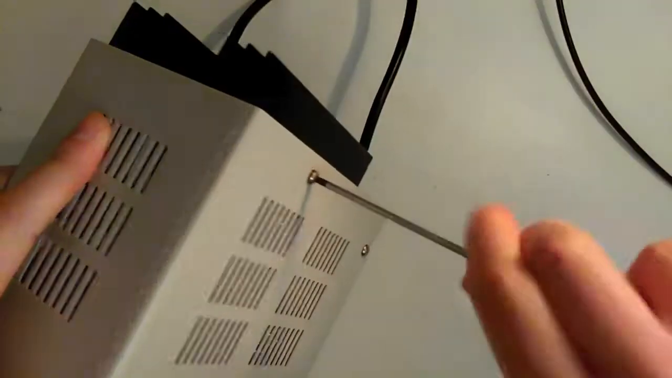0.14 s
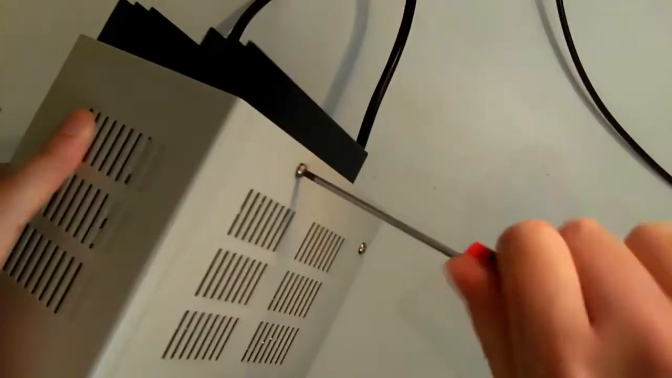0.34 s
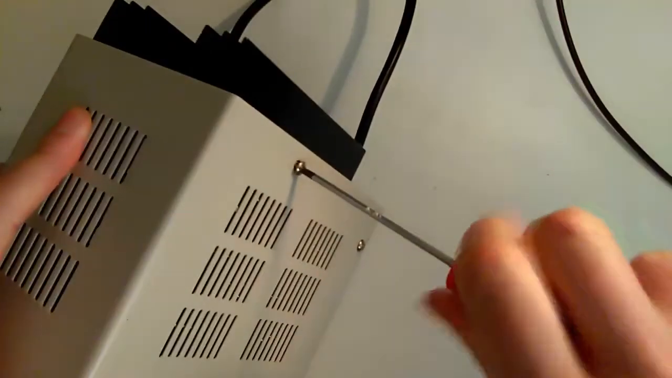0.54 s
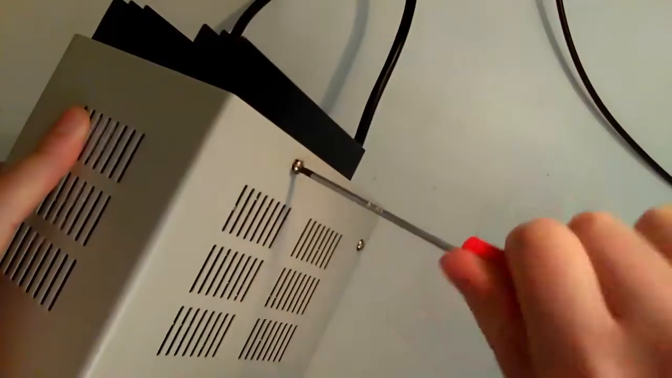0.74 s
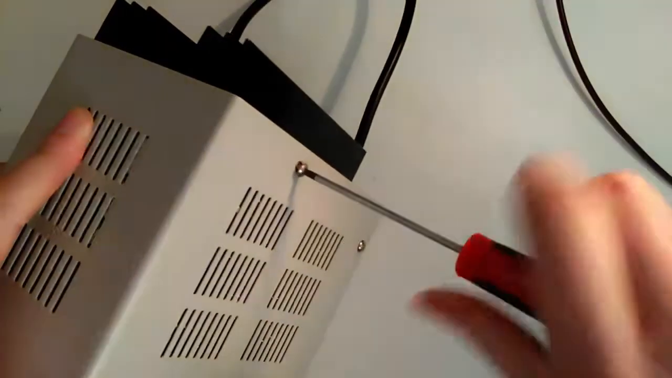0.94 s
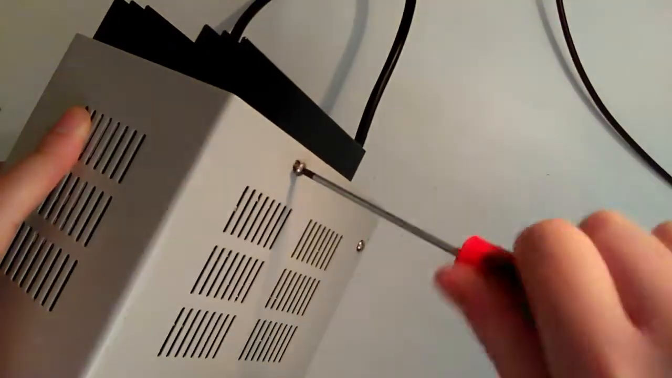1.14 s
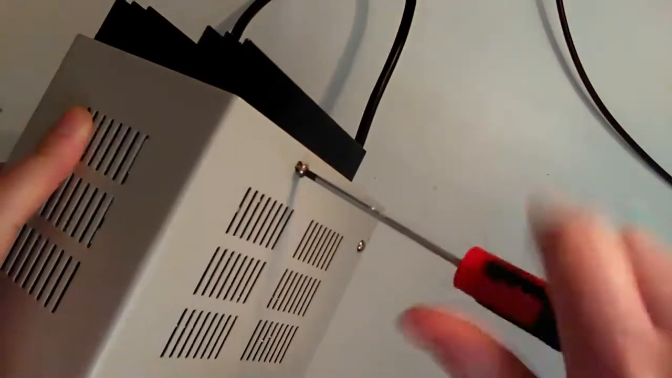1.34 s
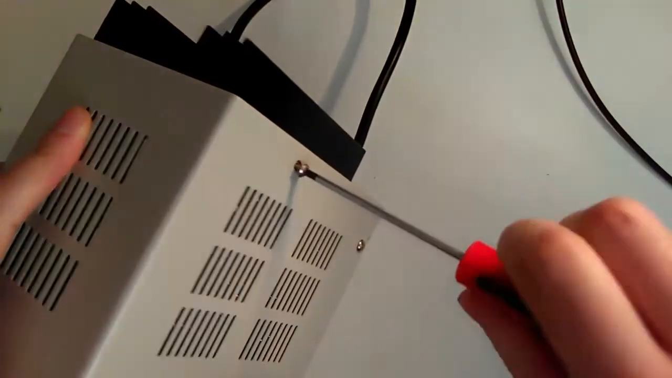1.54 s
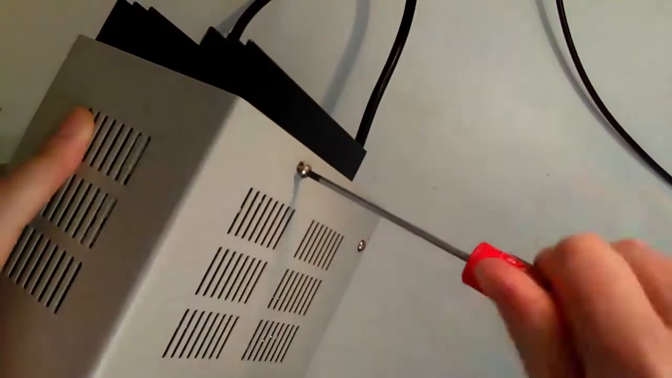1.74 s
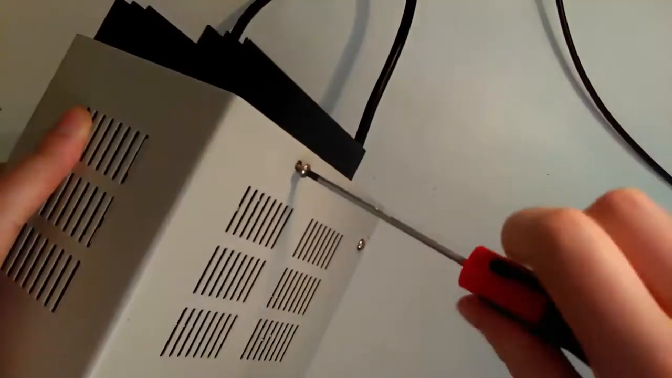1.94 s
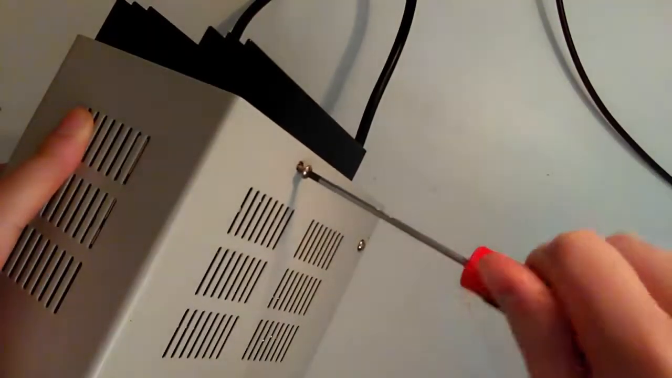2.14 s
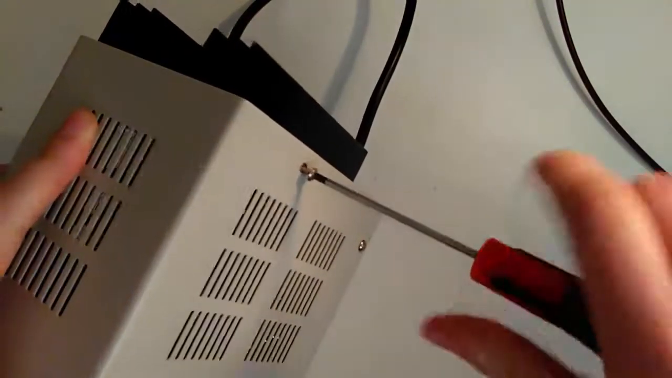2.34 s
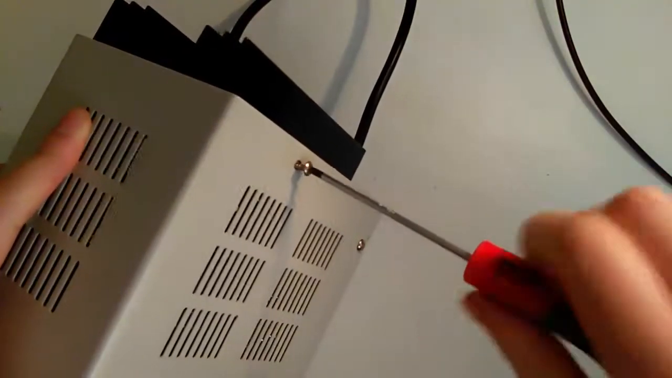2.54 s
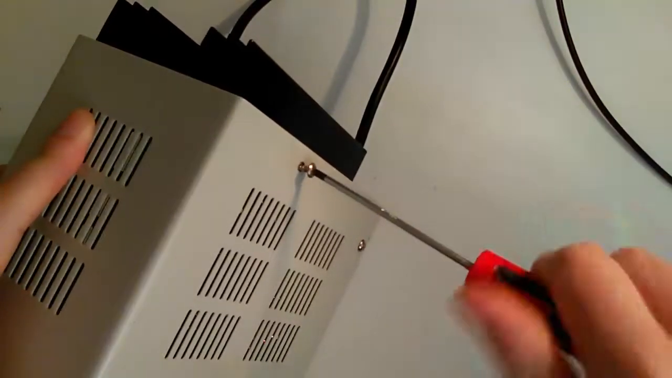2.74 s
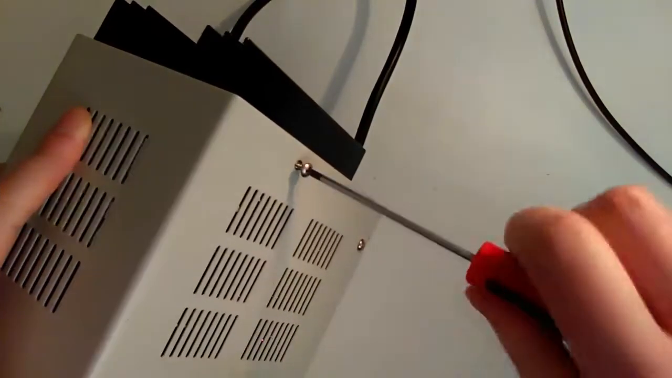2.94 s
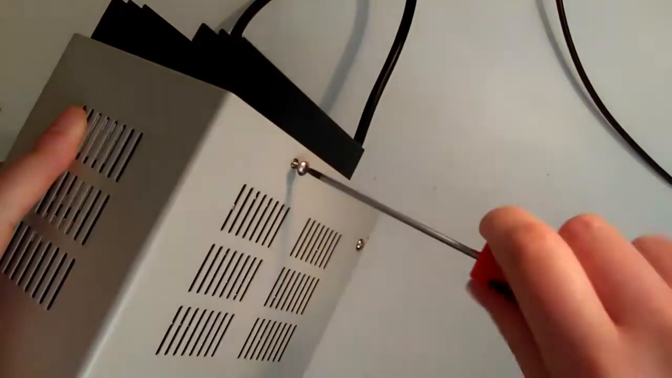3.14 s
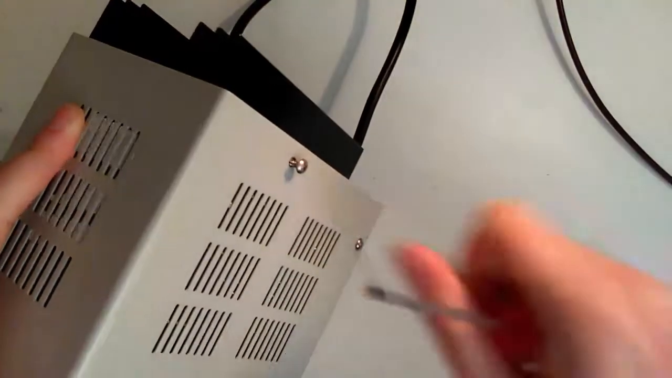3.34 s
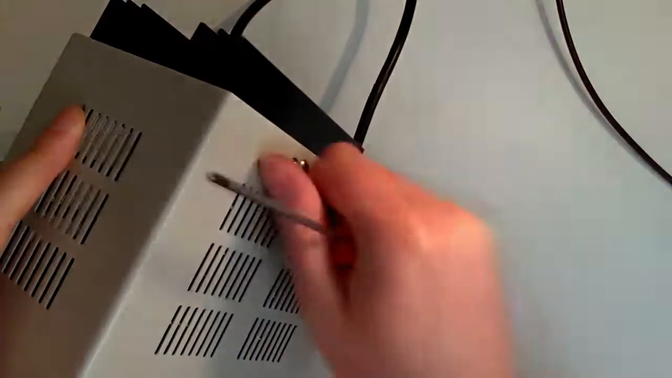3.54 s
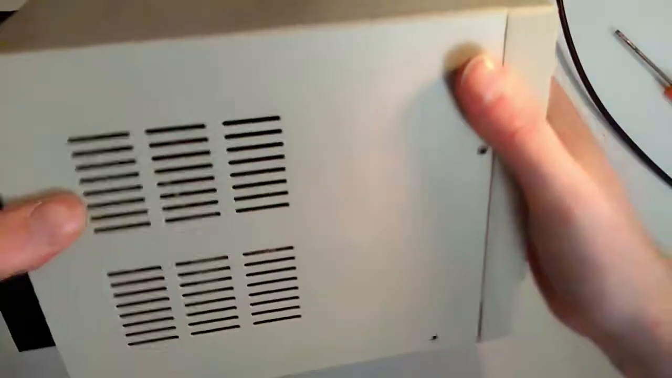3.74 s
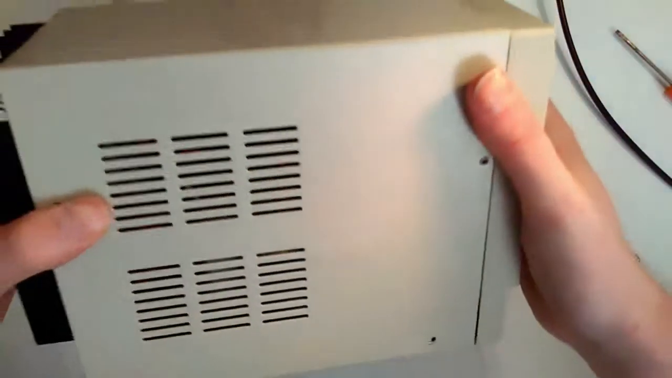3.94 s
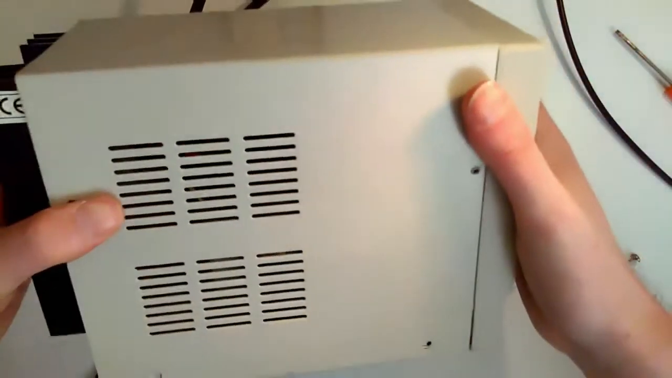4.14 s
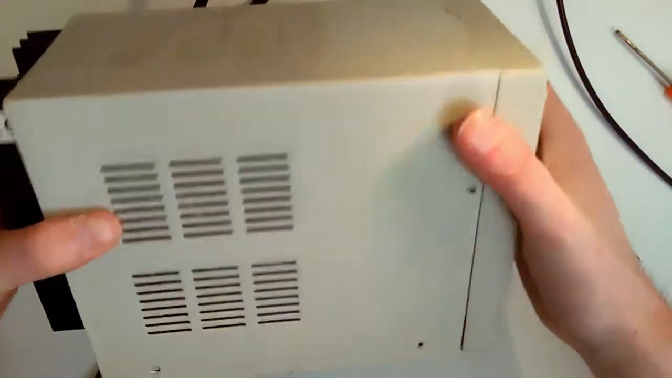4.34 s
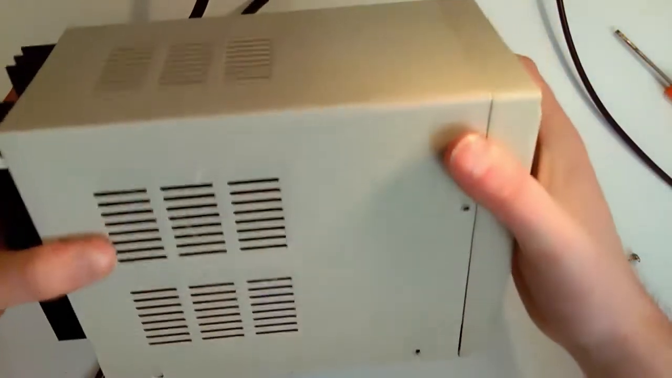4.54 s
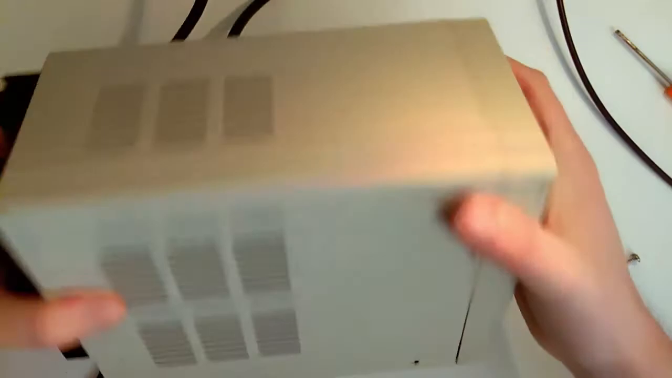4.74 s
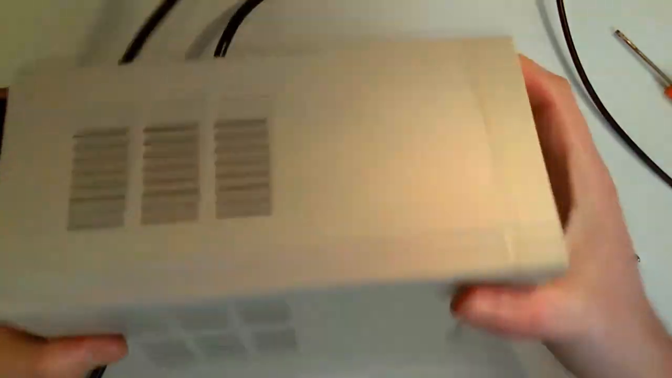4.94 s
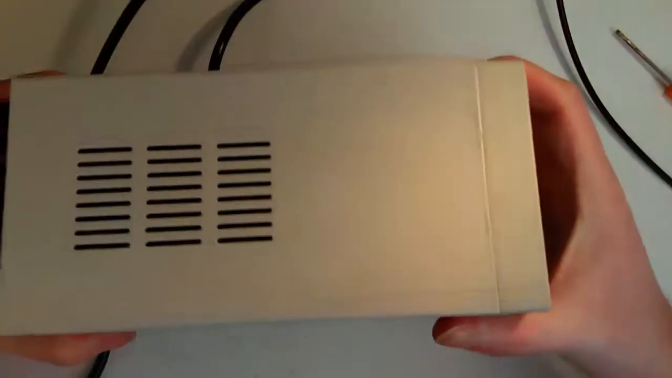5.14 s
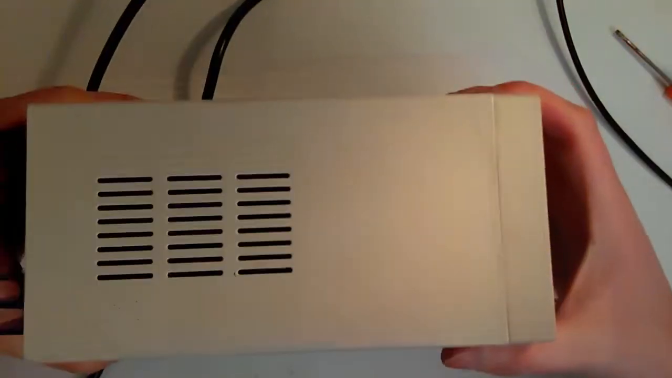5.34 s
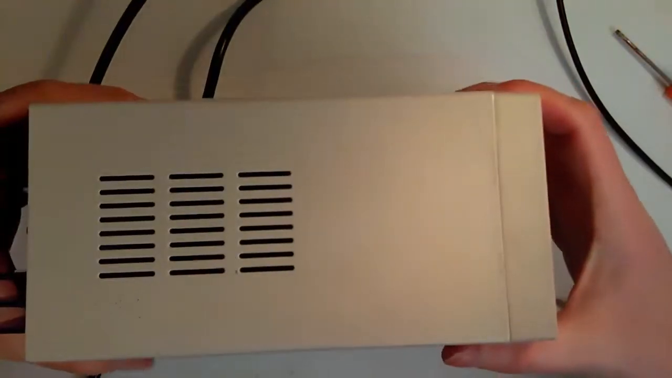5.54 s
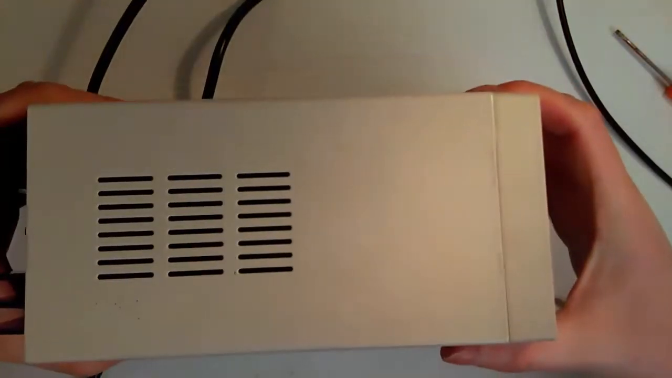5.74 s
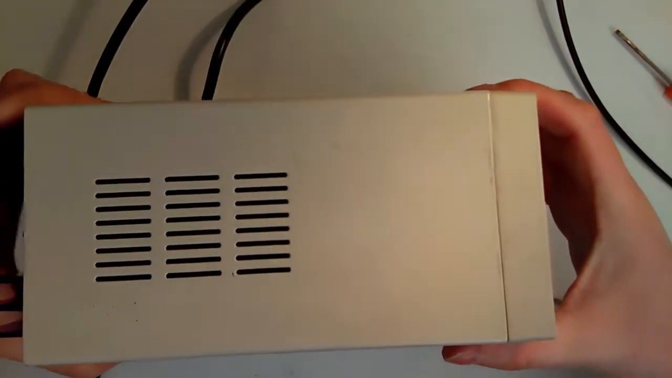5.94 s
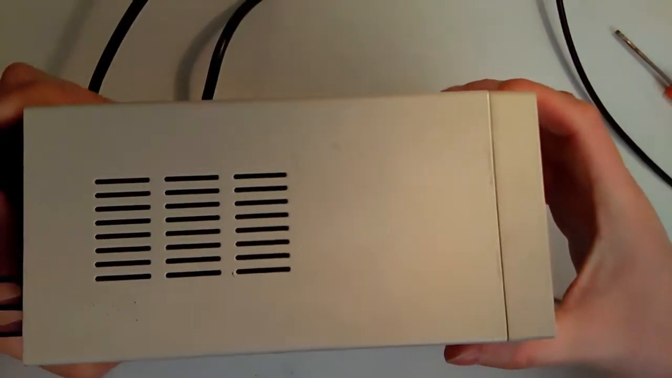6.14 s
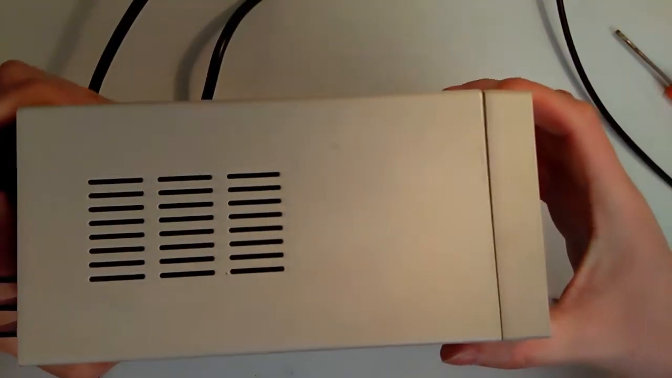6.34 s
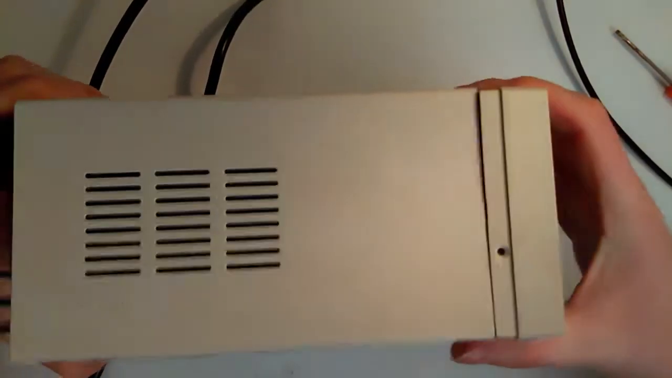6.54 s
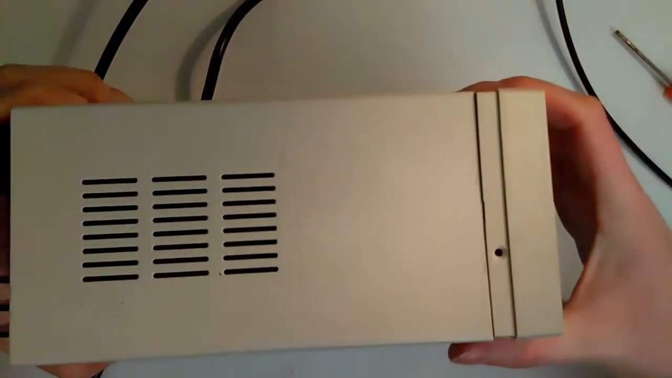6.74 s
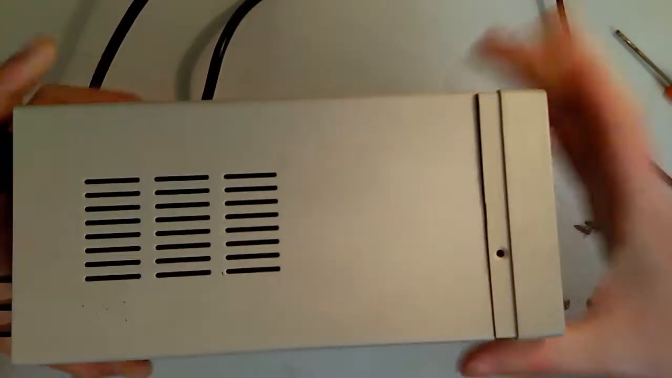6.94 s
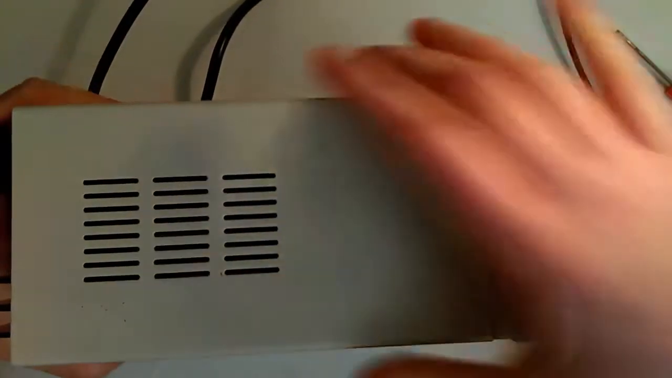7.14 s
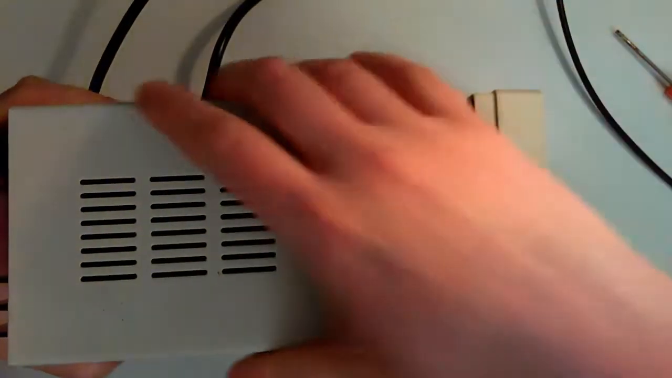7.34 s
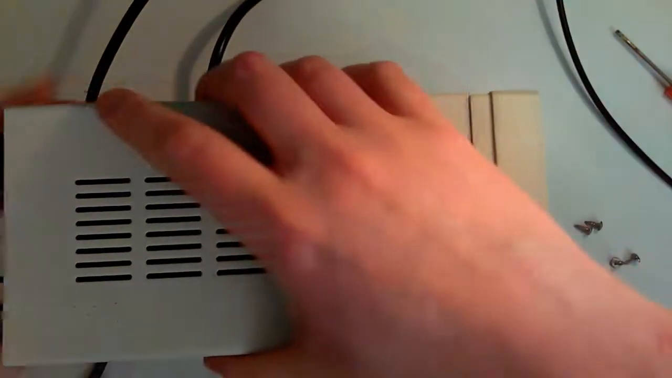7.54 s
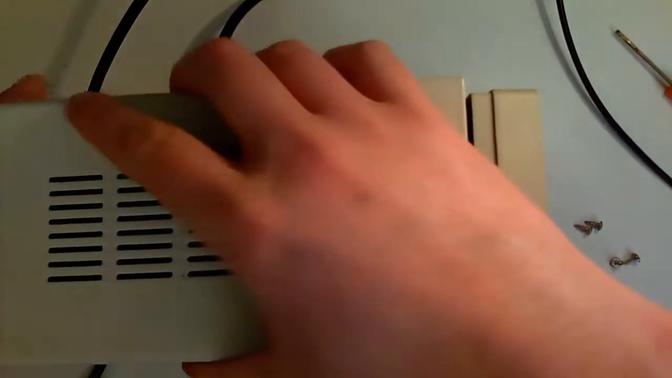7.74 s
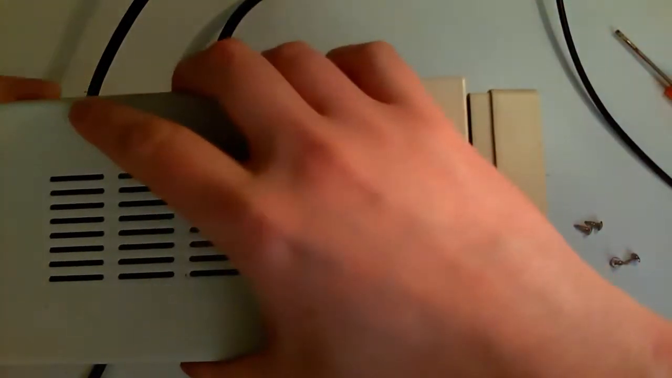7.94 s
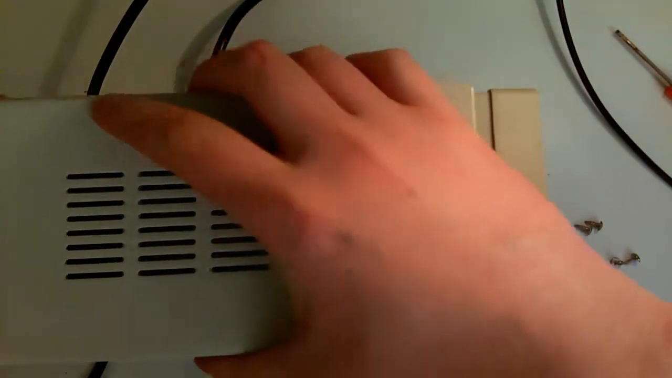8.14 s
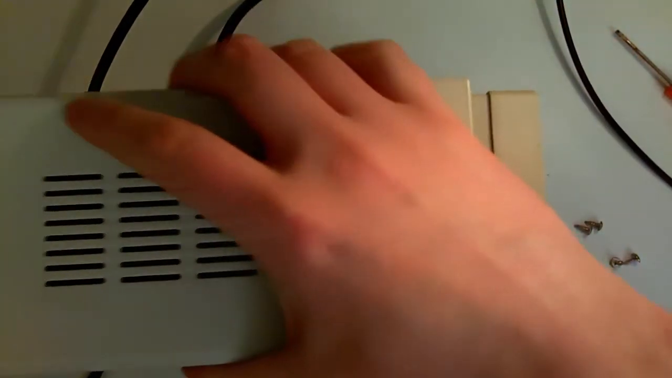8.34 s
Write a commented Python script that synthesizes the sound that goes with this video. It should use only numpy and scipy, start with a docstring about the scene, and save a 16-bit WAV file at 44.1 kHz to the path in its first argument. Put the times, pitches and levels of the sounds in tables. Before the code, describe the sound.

A hand screwdriver backs a screw out of a sheet-metal case with soft scrapes and clicks. Fingers swish faintly round the handle and a thin squeal passes. Then, louder, the case is turned and set down with dull desk thumps, and its cover slides off with scrapes and ringing metal knocks. One microphone picks it up in a small room with a faint low hum.

```python
"""First comes a small room's low hum, with soft scrapes and clicks as a hand screwdriver backs a screw
out of a sheet-metal case on a desk. Fingers swish round the handle and a thin squeal passes.
Then, louder, the case is turned, set down and its cover slid off. Knocks and scrapes make the metal
panels ring; thumps make the desk top ring. A noise suppressor turns the background down between sounds."""
import sys
import numpy as np
from scipy import signal
from scipy.fft import rfft, irfft
from scipy.io import wavfile
from scipy.ndimage import uniform_filter1d, minimum_filter1d

SR = 44100
rng = np.random.default_rng(int(sys.argv[2]) if len(sys.argv) > 2 else 0)


def file_out(sig):
    """Save sig as 16-bit WAV at sys.argv[1]."""
    # one column per channel
    cols = np.atleast_2d(sig).T
    # limit, then scale
    lim = np.clip(cols, -1, 1)
    pcm = np.round(lim * 32767).astype(np.int16)
    wavfile.write(sys.argv[1], SR, pcm)


N = 370440


def undb(db):
    """Turn decibels into a number to multiply by."""
    return 10 ** (np.asarray(db) / 20)


def unit(x):
    """Scale a sound to an average power of 1."""
    return x / np.sqrt(np.mean(x ** 2))


def colour(x, table):
    """Turn each pitch up or down along a curve of (pitch [Hz], level [dB])."""
    hz, db = np.transpose(table)
    f = np.fft.rfftfreq(x.shape[-1], 1 / SR) + 1e-9
    return irfft(rfft(x) * undb(np.interp(np.log(f), np.log(hz), db)), x.shape[-1])


def fade(ring_s, seconds):
    """A fade that drops 60 dB in ring_s seconds."""
    return np.exp(-np.log(1000) * np.arange(int(seconds * SR)) / SR / ring_s)


def rings(hz, ring_s, seconds):
    """Pure tones dying away, one in each row."""
    t = np.arange(int(seconds * SR)) / SR
    return np.sin(2 * np.pi * np.outer(hz, t)) * np.array([fade(d, seconds) for d in ring_s])


def near(hz, main_hz, octaves, far_db):
    """Tones near the main pitch take more of a blow than those far from it."""
    return undb(far_db * (1 - np.exp(-.5 * (np.log2(hz / main_hz) / octaves) ** 2)))


def add(out, s, sound, db):
    """Place a sound at time s with its peak at db."""
    i = int(s * SR)
    out[i:i + len(sound)] += (sound * undb(db) / np.abs(sound).max())[:N - i]


def wander(per_s, spread_db):
    """A volume that drifts to a new random level per_s times a second."""
    levels = undb(spread_db * rng.standard_normal(int(per_s * N / SR) + 2))
    return np.interp(np.arange(N) * per_s / SR, np.arange(len(levels)), levels)


# The tone of room air and microphone hiss: (pitch [Hz], level [dB])
AIR_TONE = [(20, 12), (50, 16.5), (110, -27), (160, 10.5), (256, -2), (416, 0.5), (714, -2), (1440, -15),
            (2220, -14), (4250, -22.5), (11600, -17.5), (16000, -20.5)]
# How loud the two hums are: (time [s], 100 Hz level [dB], 120 Hz level [dB])
HUM_LEVELS = [(0, -50.5, -53.5), (3.55, -46, -52), (3.65, -50, -57), (5.2, -50.5, -59), (8.4, -42, -50.5)]


def background(air_db=-55.5, in_step_s=.0103):
    """Room air and microphone hiss under two hums that beat against each other 20 times a second."""
    t = np.arange(N) / SR
    s, low_db, high_db = np.transpose(HUM_LEVELS)
    hum = 0
    for hz, db in ((100, low_db), (120, high_db)):
        tone = np.sqrt(2) * np.cos(2 * np.pi * hz * (t - in_step_s))
        hum += tone * undb(np.interp(t, s, db)) * wander(22, 0.7)
    return hum + undb(air_db) * unit(colour(rng.standard_normal(N), AIR_TONE))


# The panels' strong tones; wider ones die sooner: (pitch [Hz], width [Hz], level [dB])
PANEL_TONES = [(444.6, 48, 2.5), (509, 83, -19.5), (579.4, 13.4, -3), (643.3, 13, -5), (771, 97, -2),
               (858, 34, -15), (994.3, 29, 3.5), (1115, 76, -10), (1253, 50, -3), (1293, 68, 5),
               (1460, 49, -7), (1764, 39, -5), (2048, 160, -1), (2307, 220, 2.5), (2548, 260, -1.5),
               (2936, 320, -9.5), (3070, 120, -29)]
# The case's many weak tones in between: (pitch [Hz], level [dB])
WEAK_TONES = [(150, -15.5), (250, -5.5), (537, -5), (594, -3), (1170, -6.5), (1320, -12), (1480, -15.5),
              (2920, -10), (5000, -27), (6500, -90), (11000, -120)]
# The bright noise of a scrape's hiss or a knock's crack: (pitch [Hz], level [dB])
BRIGHT_TONE = [(1470, -14), (2500, -0.5), (3570, -4), (5150, -7), (6500, -6), (9150, -5), (15200, -17.5),
               (16000, -13.5)]
# The desk top's tones: (pitch [Hz], level [dB])
DESK_TONES = [(104, -2), (111, -11), (118, 9), (128, -5.5), (143, 5), (160, -9), (215, -5), (250, -6.5),
              (277, -12.5), (345, -6.5), (398, -18.5)]
# Scrapes of hand, thread or cover. The last three levels are added to the large panels' level:
# (peak time [s], large panels [dB], time to swell 20 dB [s], time to fade 20 dB [s], main pitch [Hz],
# small panels [dB], hiss of skin and rough edges [dB], desk rumble [dB])
SCRAPES = [(.1, -52, .15, 0.34, 544, -16, -18, 9.5), (.39, -49, 0.1, -0.03, 647, -18, -13, -4),
           (.48, -44, 0.09, 0.08, 630, -11, -17, 11.5), (.53, -50, 0.03, 0.22, 614, -18, -11, 12),
           (.84, -47.5, .06, 0.33, 520, -14, -13, 1), (.97, -58, 0.25, -0.44, 609, -9, -2, 14),
           (1.22, -57, 0.1, -0.34, 567, -6, 0.5, 12), (1.54, -56.5, 0.2, 0.4, 670, -6.5, -15.5, 6),
           (1.891, -53.5, 0.3, -0.03, 665, -7, -10, 11.5), (2.25, -53, 0.26, -0.3, 888, -6.5, -8, -4),
           (2.331, -43.5, 0.1, 0.12, 600, -14, -31, 5), (2.451, -37, 0.05, 0.19, 1080, -15, -14, -1),
           (2.54, -46.5, 0.18, 0.3, 689, -28.5, -6.5, 8.5), (2.868, -37, 0, .25, 1060, -17, -30, -5),
           (3.15, -56, 0.53, 0.25, 1050, -12, -1.5, 14), (3.575, -40, 0.01, 0.09, 500, -10.5, -32.5, 7),
           (3.701, -46, 0.2, 0, 674, -6, -14, 10), (3.926, -61.5, 1.01, 1, 690, -20, -22, 0),
           (4.169, -36.5, -0.03, 0, 530, -14, -30, 28), (4.29, -36, 0.07, 0.3, 640, -11, -16, 15.5),
           (4.35, -37.5, 0.0736, 0.17, 640, -14, -15.5, 11.5),
           (4.537, -36.5, -0.01, 0.1, 860, -6.5, -15, -10), (4.555, -55, -0.01, 0.26, 800, -12, 2, 7),
           (4.773, -37.5, 0.02, 0.0845, 600, -5.5, -11, 15), (4.82, -38, 0.07, 0.0868, 690, -12, -18.5, 14),
           (4.95, -46, 0.5, 0.05, 580, -13, -14.5, 7), (5.045, -42.5, -0.14, 0.12, 486, -15, -27, 1),
           (5.36, -43, .035, 0.21, 544, -13, -18, 20.5), (5.52, -52, -0.07, 0.43, 730, -9.5, -9, 11),
           (5.7, -53.5, 0.11, 0.52, 600, -17, -7.5, 16.5), (5.93, -59, 0, -1.3, 634, -9, -6, 7),
           (6.15, -54, 0.1, 2.8, 657, -9, -22, 10.5), (6.271, -50.5, -0.03, -0.2, 640, -8, -15.5, 22),
           (6.314, -35.5, 0, 0.3, 642, -22, -18.5, 9.5), (6.422, -31.5, 0.04, 0.02, 630, -9, -14, 13),
           (6.436, -14, 0.0063, .09, 624, -13, -18, -7.5), (6.51, -32, 0.09, 0.06, 760, -16, -21, 1),
           (6.554, -13.5, 0, 0.0333, 1120, -6.5, -15, -3.5),
           (6.659, -28, 0.12, 0.0558, 1110, -33.5, -25.5, 8.5), (6.753, -47, 0.53, 1.2, 650, -26, -12, 8),
           (7.215, -50, 0.33, 0.1, 820, -11, -13, 14), (7.307, -44.5, -0.1, 0.06, 660, -27, -22, 12.5),
           (7.427, -44, 0.1, 0.2, 783, -4, -7.5, 8.5), (7.652, -33, 0.09, 0.2, 1220, -4.5, -8.5, -14),
           (7.677, -21.5, 0.02, 0.1, 955, -11.5, -16, 2), (7.96, -54.5, 0.2, 0.3, 700, -2.5, -11, 15),
           (8.141, -42, 0.17, -0.2, 692, -4.5, -3.5, -3), (8.17, -26, 0.0171, 0.1, 680, -6, -13.5, -7),
           (8.335, -35.5, 0.066, 0.7, 810, -2.5, -5.5, 2), (8.39, -34, 0.06, -5, 834, -4, -12, 3)]


def scrapes(slips_per_s=3000, split_hz=1550):
    """Tiny uneven slips hiss, rumble the desk and shake the panels, most of all the one being held."""
    _, large_db, _, _, held_hz, small_db, hiss_db, desk_db = np.transpose(SCRAPES)
    slips = (rng.random(N) < slips_per_s / SR) * rng.standard_normal(N)
    slips *= undb(2 * np.minimum(rng.exponential(size=N), 3))  # a few slips are stronger
    slips = unit(slips) * wander(50, 2.2)
    large = slips * pressure(large_db, rest_db=-69.5)
    small = slips * pressure(large_db + small_db, rest_db=-76)
    metal = 0
    for push, side, db in ((large, "low", 16.5), (small, "high", 23)):  # large panels sound lower
        band = signal.butter(4, split_hz, side, fs=SR, output="sos")
        metal += undb(db) * signal.sosfilt(band, colour(push, WEAK_TONES))
    for hz, width, db in PANEL_TONES:
        if hz < split_hz:
            held_db = 20 * np.log10(near(hz, held_hz, octaves=0.11, far_db=-13.5))
            push = undb(18.5) * slips * pressure(large_db + held_db, rest_db=-77.5)
        else:
            push = undb(15) * small
        push *= wander(8, 2.1)  # the moving touch finds and loses each panel
        metal += undb(db) * signal.lfilter(*signal.iirpeak(hz, hz / (0.4 * width), SR), push)
    hiss = unit(colour(0.35 * slips + rng.standard_normal(N) * wander(40, 3.26), BRIGHT_TONE))
    hiss *= pressure(large_db + hiss_db, rest_db=-67.5, lingers=0.76)
    hz, db = np.transpose(DESK_TONES)
    desk_ring = undb(db + 3.1 * np.log2(hz / 118)) @ rings(hz, np.full(len(hz), 0.1), 0.21)
    rumble = unit(signal.fftconvolve(rng.standard_normal(N), desk_ring)[:N])
    rumble *= pressure(large_db + desk_db, rest_db=-48.5, lingers=1.19)
    return undb(-3) * metal + hiss + undb(-4) * rumble


def pressure(db, rest_db, lingers=1, settle_db=-25, settle_s=0.32):
    """How hard the rubbing is: each scrape swells, fades and settles to the level of resting hands."""
    s, _, swell_s, fade_s = np.transpose(SCRAPES)[:4, :, None]
    t = np.arange(0, N / SR, .001)
    after = np.maximum(t - s, 0)
    # swell or fade times of zero or less give a sudden edge
    swelling = undb(20 * np.minimum(t - s, 0) / np.maximum(swell_s, .002))
    fading = undb(-20 * after / np.maximum(fade_s * lingers, .01))
    settling = undb(settle_db - 20 * after / settle_s)
    shape = np.where(t < s, swelling, np.maximum(fading, settling))
    power = undb(db) ** 2 @ shape ** 2 + undb(rest_db) ** 2
    return np.interp(np.arange(N) / SR, t, np.sqrt(power))


# Metal hitting metal: (time [s], level [dB], extra crack level [dB], main pitch [Hz],
# rattle time [s], strength of tones far from that pitch [dB])
KNOCKS = [(0.371, -42, -28, 590, 0.011, -5.5), (0.476, -35, -15, 634, .017, -6.5),
          (0.817, -39.5, -19, 503, .014, -2.5), (0.839, -36, -30, 444, 0.027, -7.5),
          (1.213, -41.5, -10, 427, .011, -4), (1.543, -44, -6, 580, 0.0069, -3),
          (1.898, -41, -13, 630, .012, -4.5), (2.236, -40.5, -16.5, 1120, 0.033, -2),
          (2.262, -38.5, -18, 988, 0.0089, -17), (2.313, -30, -20, 606, .0065, -7),
          (2.448, -19.5, -3, 1070, 0.011, -13), (2.493, -30, -10, 680, 0.02, -7),
          (2.536, -36, -5, 590, 0.033, -9), (2.866, -21.5, -27, 1170, 0.021, -20.5),
          (3.149, -39.5, -1, 1090, 0.038, -23.5), (3.573, -30.5, -15.5, 440, 0.008, -9),
          (3.659, -35, -11.5, 640, 0.053, -4.5), (3.705, -35, -33, 655, 0.008, -6),
          (3.731, -33, -18.5, 650, 0.017, -24), (3.914, -41, -22, 642, .009, -8),
          (3.949, -46.5, -30, 636, 0.013, -12), (4.029, -46, -21, 643, 0.011, -5),
          (4.171, -20.5, -25.5, 445, 0.03, -17.5), (4.215, -23, -22.5, 447, 0.019, -18),
          (4.28, -28.5, -30, 645, 0.014, -20), (4.326, -26.5, -43, 640, .01, -20),
          (4.46, -43.5, -9, 1090, 0.018, -8.5), (4.504, -35.5, -17, 1040, 0.011, -13),
          (4.538, -23, -14, 945, 0.0067, 0.5), (4.808, -27, -36, 700, 0.029, -7),
          (4.843, -36.5, -37, 613, .011, -7), (4.895, -30, -47, 580, .014, -4.5),
          (4.956, -36, -12.5, 620, 0.07, -6), (4.989, -31.5, -17, 493, 0.014, -6),
          (5.034, -27.5, -37, 460, 0.041, -28), (5.329, -35, -39, 470, 0.0071, -9),
          (5.348, -31, -42, 577, 0.018, -11.5), (5.459, -40, -7, 715, 0.023, -15.5),
          (5.508, -39, -5, 1300, 0.029, -4), (5.613, -38, -34.5, 610, 0.011, -22),
          (5.828, -38, -7.5, 633, .008, -4), (5.888, -44, -5, 651, .0063, -11),
          (5.927, -42.5, -18, 478, .017, -2), (6.137, -39.5, -18, 649, 0.009, -6),
          (6.316, -18, -19, 646, 0.014, -9.5), (6.434, -9.5, -16, 557, 0.02, -2),
          (6.551, -0.5, -17, 1260, .015, -4), (6.655, -17, -31, 1230, 0.0069, -5),
          (6.733, -37.5, -28, 486, .022, -15.5), (6.89, -36.5, -16, 461, 0.018, -4.5),
          (6.982, -36, -13, 1340, 0.024, -2.5), (7.136, -33, -23, 587, 0.0081, 1),
          (7.16, -36, -17, 770, 0.013, 1), (7.218, -28, -19.5, 816, 0.025, -7.5),
          (7.288, -24.5, -24, 770, 0.0084, -12.5), (7.424, -26, -31.5, 760, 0.01, -2.5),
          (7.578, -38.5, -7, 789, .012, -6.5), (7.649, -25, -8, 1360, 0.016, -9.5),
          (7.672, -14.5, -15, 1060, 0.011, 9), (7.892, -39.5, -14.5, 549, 0.011, -4),
          (8.04, -40.5, -4.5, 1800, 0.01, -27), (8.158, -18, -22, 574, 0.04, -2.5),
          (8.33, -26.5, -12.5, 660, 0.051, 0), (8.39, -17, -17, 1040, .02, 6)]


def knocks(length_s=.3):
    """A hit and a short rattle make the case ring, with a bright crack on top."""
    out = np.zeros(N)
    hz, width, tone_db = np.transpose(PANEL_TONES)
    tones = rings(hz, 3.73 / width, length_s)
    t = np.arange(tones.shape[1]) / SR
    for s, db, crack_db, main_hz, rattle_s, far_db in KNOCKS:
        contact, weak_noise, crack_noise = rng.standard_normal((3, len(t)))
        contact[0] = 17.3  # the first hit
        contact *= np.exp(-(t / (0.59 * rattle_s)) ** 2)  # the rattle holds briefly, then stops
        spot = rng.standard_normal(len(hz))  # every spot shakes the panels differently
        strength = undb(tone_db + 0.17 * spot) * np.sign(spot)
        panels = (strength * near(hz, main_hz, 0.11, 2.54 * far_db)) @ tones
        # weak tones fade fast and lean to the same pitch; a harder hit wakes more of them
        weak = colour(weak_noise, WEAK_TONES) * fade(0.058, length_s)
        weak = undb(far_db) * weak + signal.lfilter(*signal.iirpeak(main_hz, 1.5, SR), weak)
        body = unit(panels) + undb(1.5 + 0.17 * crack_db) * unit(weak)
        add(out, s, signal.fftconvolve(contact, body)[:len(t)], db)
        crack_shape = fade(5 * rattle_s, length_s) + 0.05 * fade(0.063, length_s)
        crack_shape -= 0.74 * fade(0.0015, length_s)  # soften the start
        add(out, s, colour(crack_noise, BRIGHT_TONE) * crack_shape, db + crack_db + 6.5)
    return out


# Each new grip on the screwdriver: (time [s], length [s], level [dB])
GRIPS = [(0.435, 0.068, -55), (0.574, 0.052, -55.5), (0.825, 0.04, -58), (1.146, 0.1, -53.5),
         (1.49, 0.086, -52), (1.829, 0.06, -52), (2.183, 0.082, -52), (2.809, 0.058, -53),
         (3.155, 0.032, -55.5)]
# The tone of sliding skin: (pitch [Hz], level [dB])
SKIN_TONE = [(1060, -52), (1800, -4), (2510, -11), (2750, 6.5), (3380, -11), (3940, -4), (6130, -20),
             (8480, -5), (11600, -4.5), (15500, -21)]


def finger_swishes():
    """Fingers slip round the handle, making smooth swells of noise."""
    swell = np.zeros(N)
    for s, length_s, db in GRIPS:
        add(swell, s, np.hanning(int(length_s * SR)) ** 0.69, db)
    return swell * unit(colour(rng.standard_normal(N), SKIN_TONE))


# Weight landing on the desk: (time [s], level [dB], main pitch [Hz], extra level of high tones [dB],
# ring time at 118 Hz [s])
THUMPS = [(0.889, -27.5, 107.4, -29, 0.4), (1.222, -40, 114, -23, 0.41), (1.455, -33, 105, -7.5, 0.21),
          (1.895, -36, 105, -21, 0.22), (2.154, -32, 106, -12, 0.17), (2.455, -35.5, 118, -2, 0.56),
          (2.889, -35.5, 143, 3, 0.25), (3.573, -34, 128, -20, 0.12), (4.165, -5.5, 148.6, 2.5, 0.14),
          (4.198, -22, 122, 0, 0.49), (4.238, -13, 140, -16, 0.23), (4.268, -21.5, 127, -9, 0.19),
          (4.298, -26, 115, -19, 0.22), (4.351, -21, 120, -24, 0.44), (4.411, -29, 119, -20, 0.46),
          (4.537, -23, 118, -3, 0.41), (4.607, -27, 118, -17, 0.17), (4.769, -19, 112, 12, 0.27),
          (4.943, -33.5, 113, -20, 0.46), (5.048, -30.5, 105, -9, 0.51), (5.325, -24.5, 95.5, -2.5, 0.21),
          (5.349, -8, 107.5, -16, 0.24), (5.42, -16, 109, -22, 0.094), (5.519, -27, 103, -25, 0.49),
          (6.25, -27, 109.4, -15, 0.3), (6.311, -17.5, 126, -8, 0.35), (6.559, -25.5, 126, -17, 0.86),
          (6.618, -8, 126, -25.5, 0.38), (6.886, -27, 105, -20, 0.095), (7.221, -20, 117, -21.5, 0.31),
          (7.289, -19, 120, -34, 0.17), (7.359, -29, 113, -24, 0.3), (7.424, -27, 121, -22, 0.53),
          (7.682, -16.5, 117, -29, 0.73), (8.039, -31.5, 109, -40.5, 0.32), (8.172, -27, 117, -11, 0.18),
          (8.326, -27, 107, -19, 0.26)]


def desk_thumps(push_s=0.0035):
    """A short push makes the desk top ring; a harder one reaches its higher tones."""
    out = np.zeros(N)
    hz, tone_db = np.transpose(DESK_TONES)
    high = hz > 190
    direction = np.where(high, (-1) ** np.arange(len(hz)), 1)  # high tones start up and down in turn
    for s, db, main_hz, high_db, ring_s in THUMPS:
        strength = undb(tone_db + 2 * rng.standard_normal(len(hz)) + high_db * high)
        strength *= np.where(high, 1, near(hz, main_hz, octaves=0.082, far_db=-23))
        ring = (direction * strength) @ rings(hz, ring_s * (118 / hz) ** 0.35, 0.72)
        add(out, s, signal.fftconvolve(ring, np.hanning(int(push_s * SR))), db)
    return out


# The squeal's two narrow bands of noise: (pitch [Hz], width [Hz], level [dB])
SQUEAL_BANDS = [(2175, 80, 4.5), (1220, 130, 0.5)]


def squeal(start_s=1.55, end_s=2.2, swell_db_per_s=452, fade_db_per_s=8.5):
    """A thin squeal, probably the thread turning, swells fast, fades slowly and stops."""
    age = np.arange(N) / SR - start_s
    db = -64 + np.minimum(swell_db_per_s * age, -fade_db_per_s * age)
    db -= 4.5 * (age > 0.13)  # the level steps down soon after the start
    bands = 0
    for hz, width, band_db in SQUEAL_BANDS:
        band = signal.lfilter(*signal.iirpeak(hz, hz / width, SR), rng.standard_normal(N))
        bands += undb(band_db) * unit(band)
    return bands * undb(db) * wander(25.5, 2.3) * (age < end_s - start_s)


def scene(echo_s=0.3, echo_db=-15.5):
    """Everything reaches one microphone, with the small room's short, dull echo."""
    direct = knocks() + desk_thumps() + scrapes() + squeal() + finger_swishes()
    dull_noise = signal.lfilter([1], [1, -.6], rng.standard_normal(int(.6 * SR)))
    tail = fade(echo_s, .6) * dull_noise
    echo = signal.fftconvolve(direct, tail / np.sqrt(np.sum(tail ** 2)))[:N]
    return np.tile(direct + undb(echo_db) * echo + background(), (2, 1))


def record(dry, depth_db=-10, open_db=-50, softness_db=4.5, hold_s=0.047, close_s=0.11):
    """The noise suppressor opens at once when the middle pitches get loud, waits, then closes slowly."""
    bass_hz, top_hz, ceiling = 62.7, 15800, 0.87
    middle = signal.sosfilt(signal.butter(2, [300, 8000], "band", fs=SR, output="sos"), dry[0])
    heard_db = 10 * np.log10(uniform_filter1d(middle ** 2, int(0.011 * SR)) + 1e-12)
    shut = .5 - .5 * np.tanh((heard_db - open_db) / softness_db)  # 0 is open, 1 is turned down
    hold = int(hold_s * SR) // 2 * 2 + 1
    held = minimum_filter1d(shut, hold, origin=hold // 2)
    keep = np.exp(-1 / (close_s * SR))
    closing = signal.lfilter([1 - keep], [1, -keep], held, zi=[keep])[0]
    volume = undb(depth_db * np.minimum(held, closing))
    sound = signal.lfilter(*signal.butter(2, bass_hz, "high", fs=SR), dry)  # the microphone loses bass
    sound = ceiling * np.tanh(sound * volume / ceiling)  # round off loud peaks
    treble_cut = signal.ellip(12, .2, 90, top_hz, fs=SR, output="sos")
    return signal.sosfilt(treble_cut, sound)


dry = scene()
out = record(dry)
file_out(out)
```